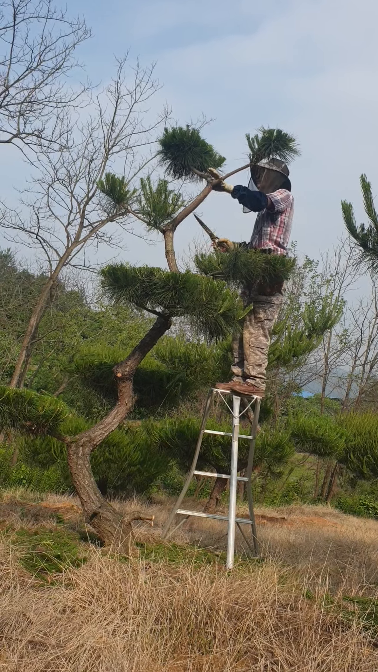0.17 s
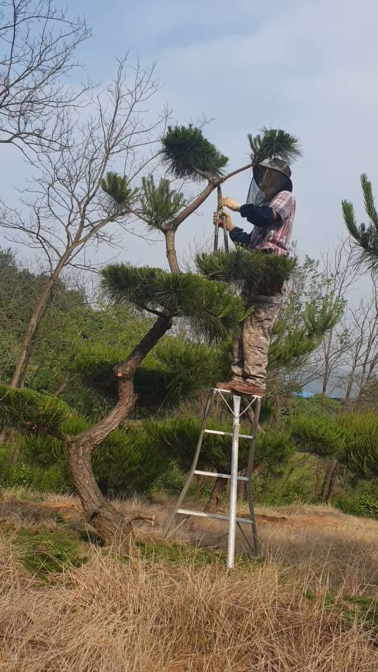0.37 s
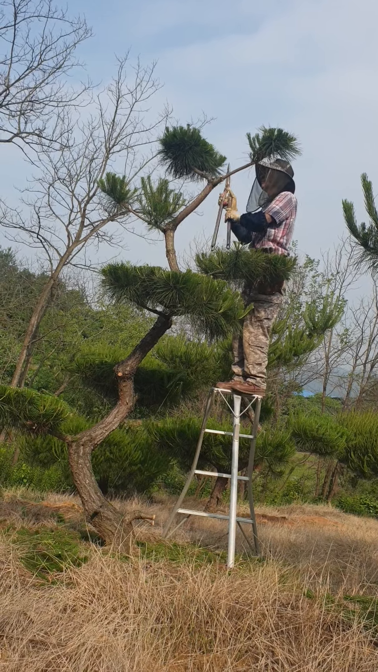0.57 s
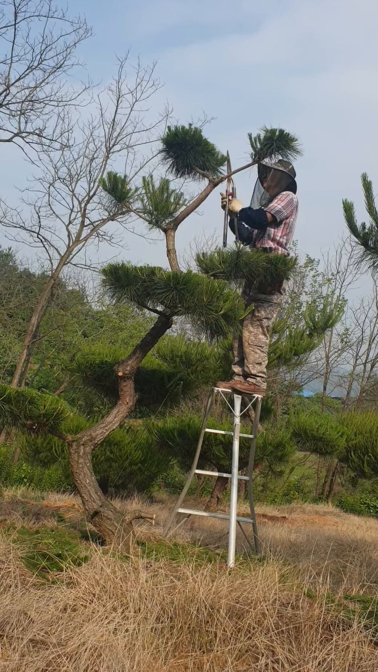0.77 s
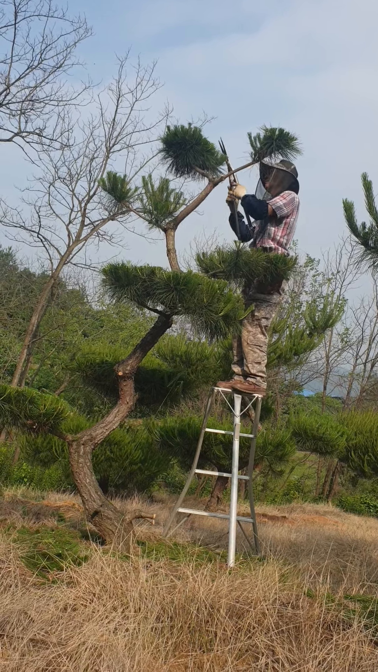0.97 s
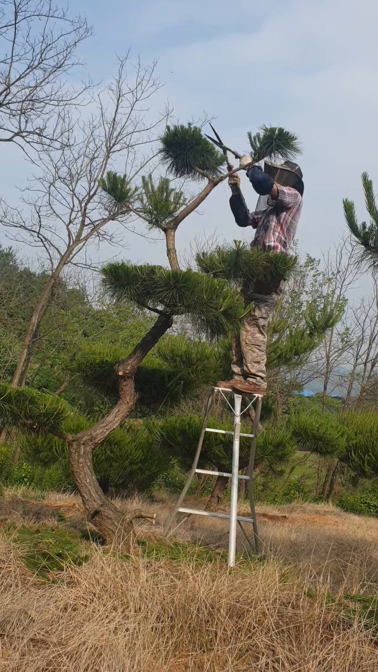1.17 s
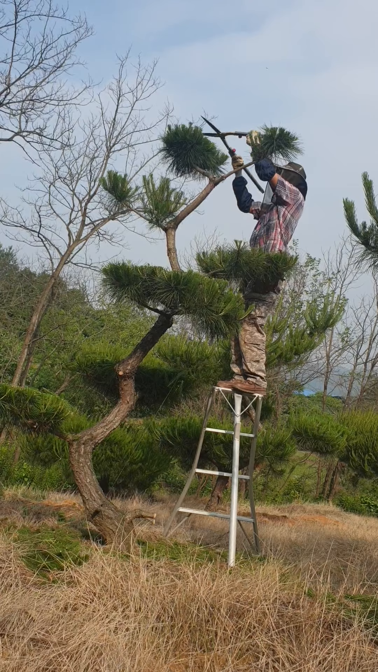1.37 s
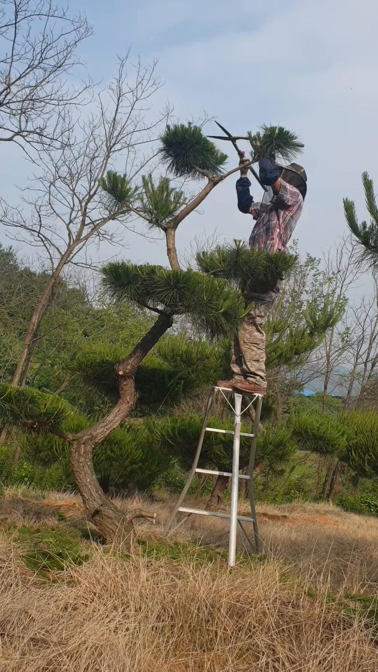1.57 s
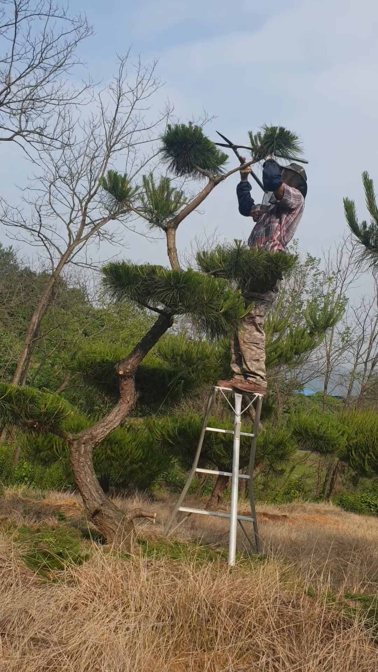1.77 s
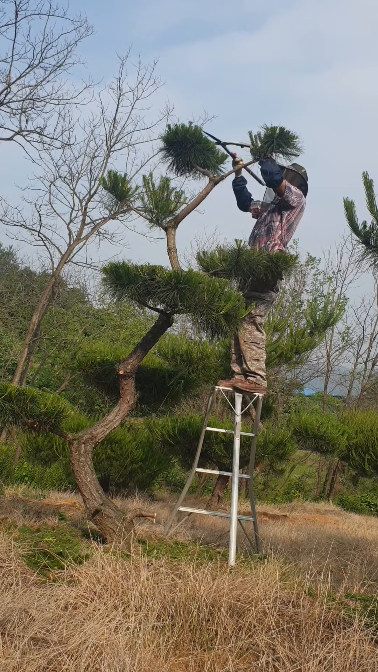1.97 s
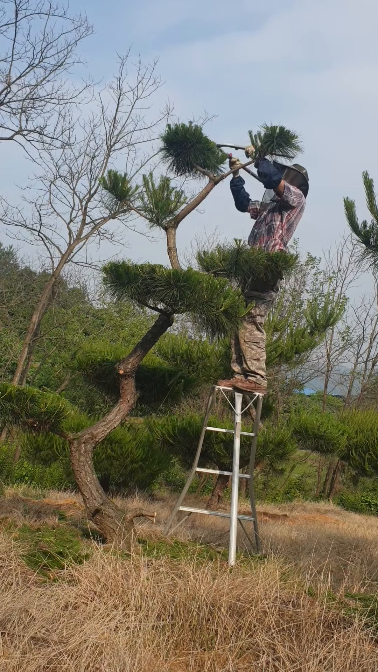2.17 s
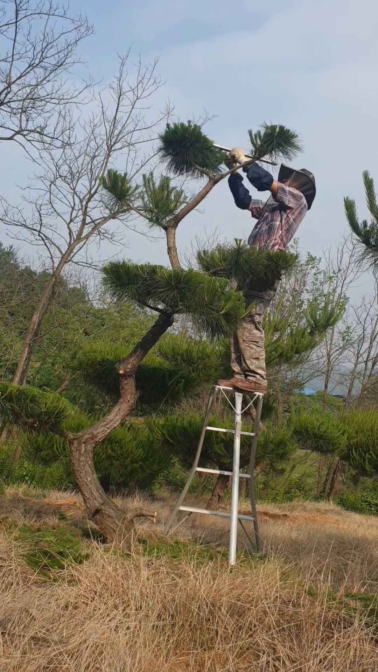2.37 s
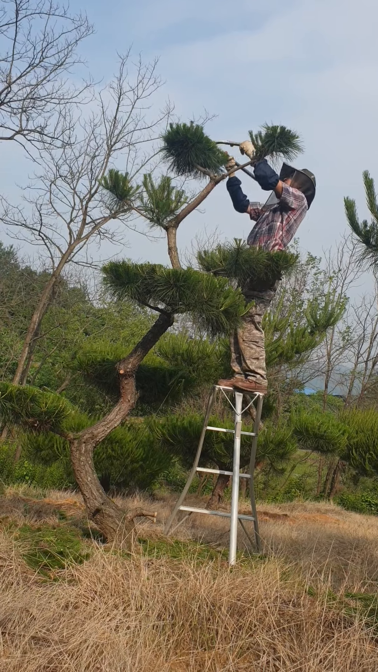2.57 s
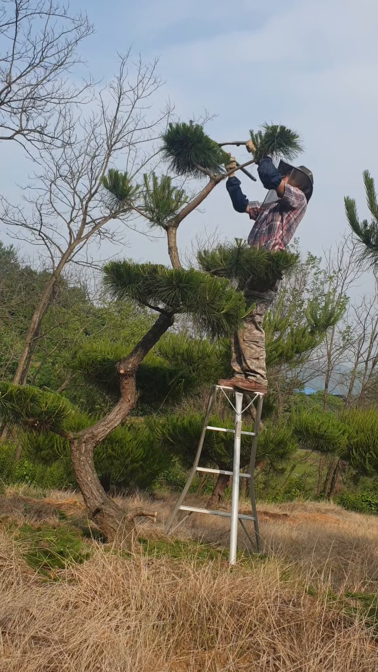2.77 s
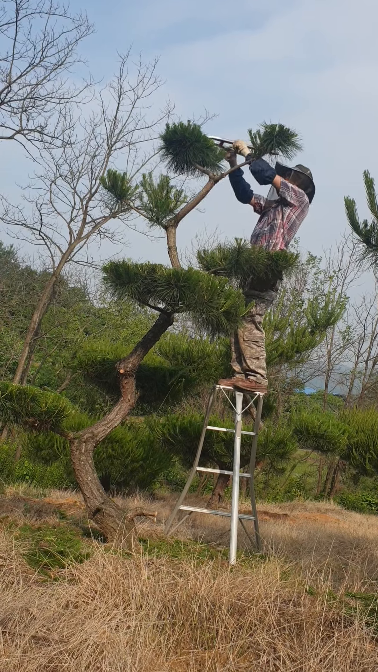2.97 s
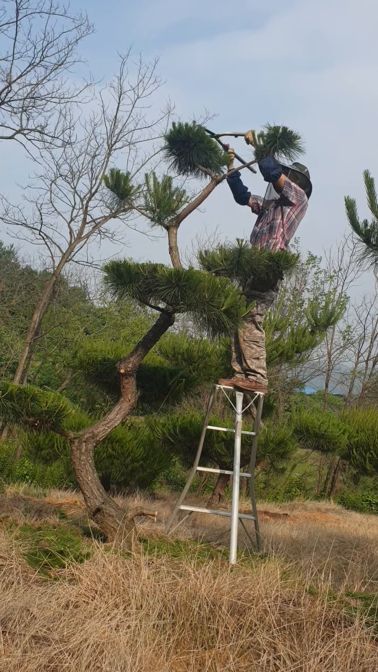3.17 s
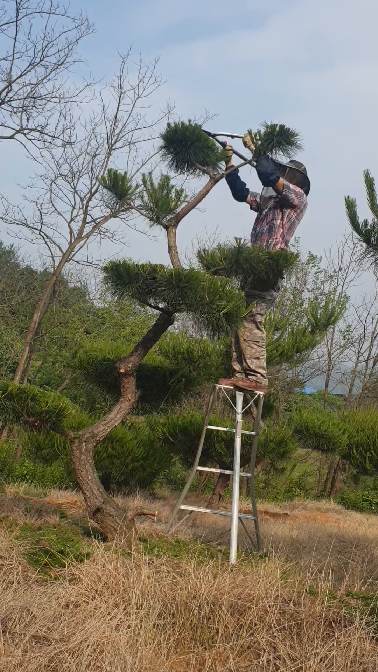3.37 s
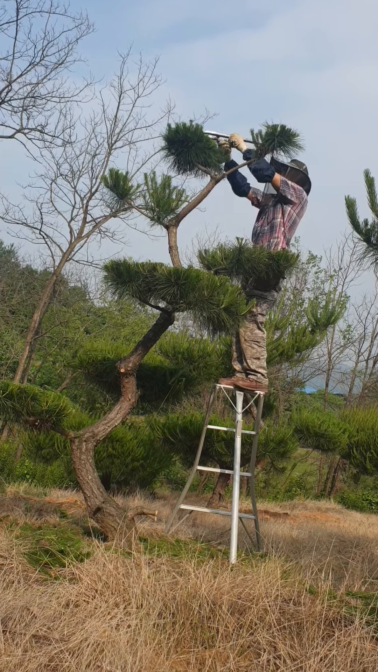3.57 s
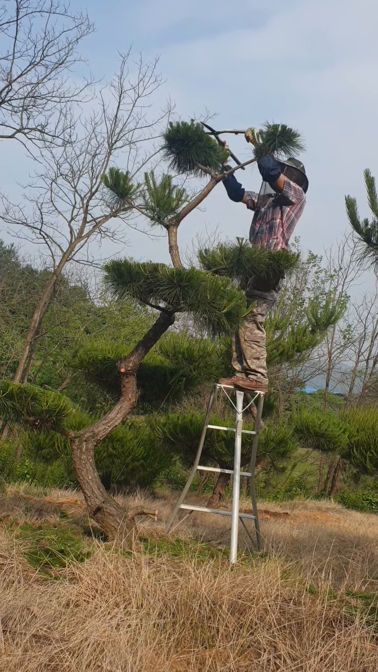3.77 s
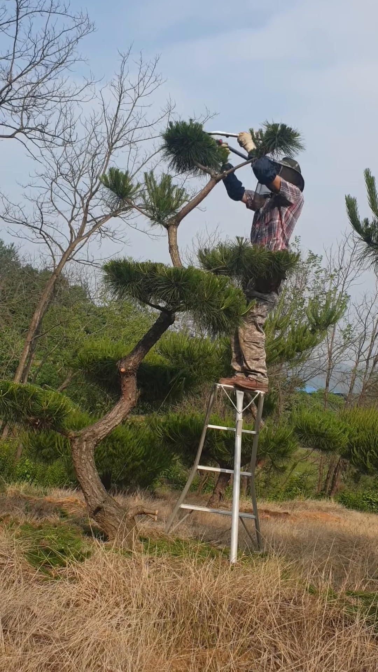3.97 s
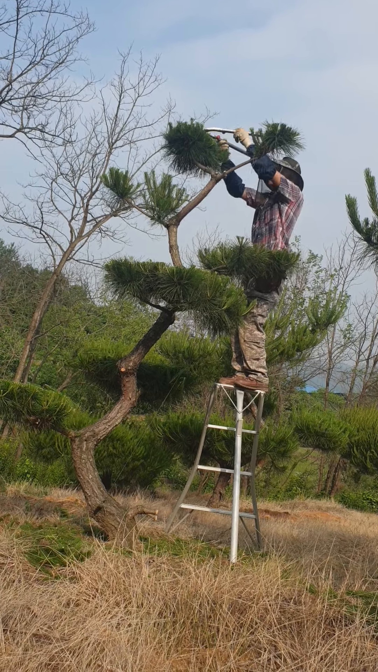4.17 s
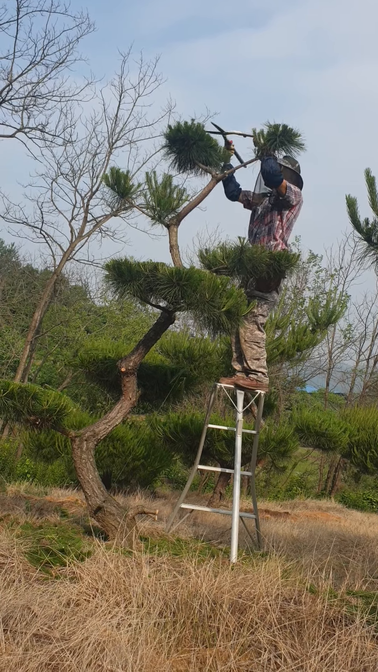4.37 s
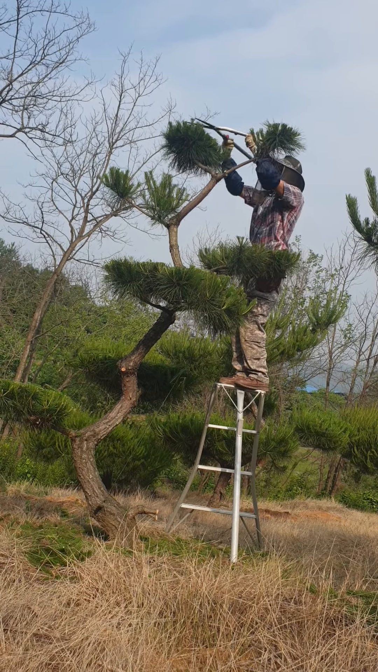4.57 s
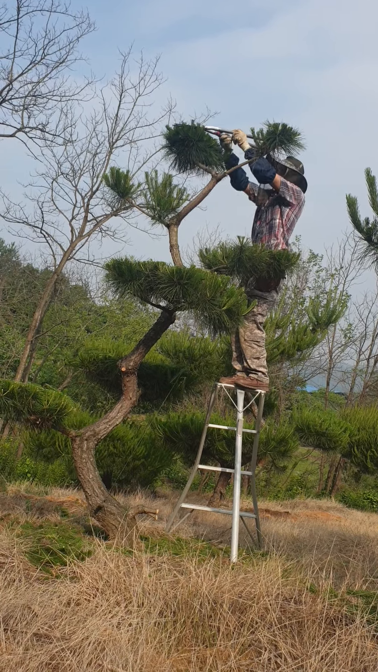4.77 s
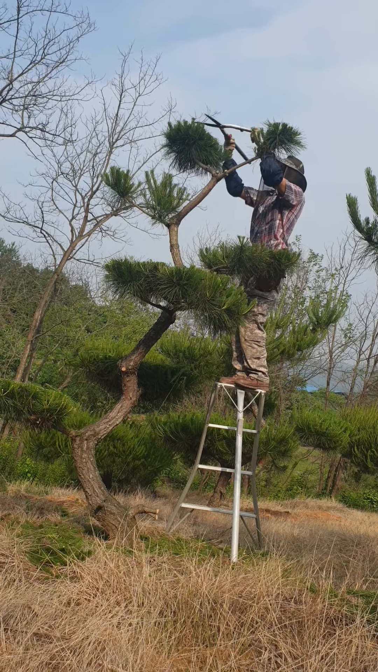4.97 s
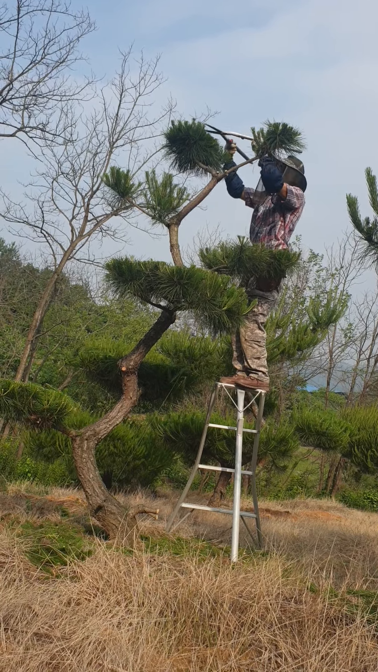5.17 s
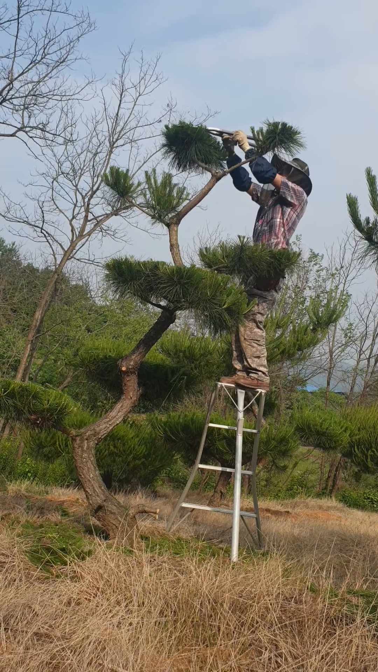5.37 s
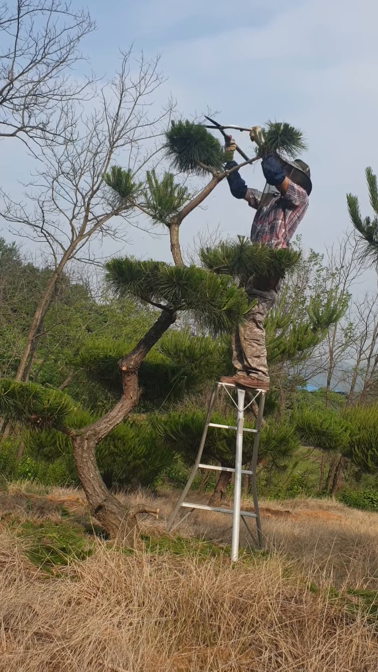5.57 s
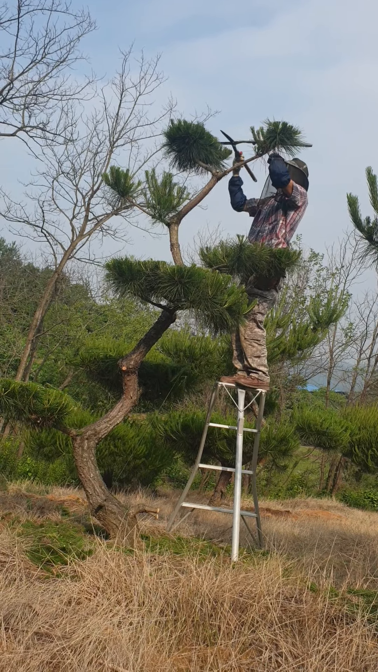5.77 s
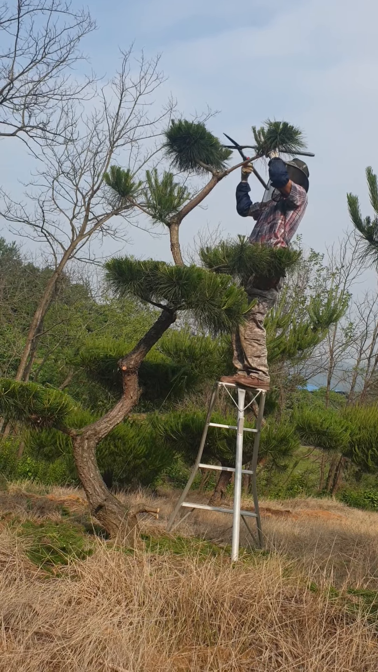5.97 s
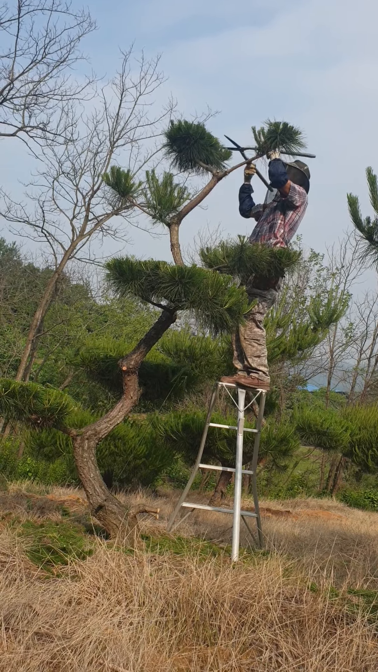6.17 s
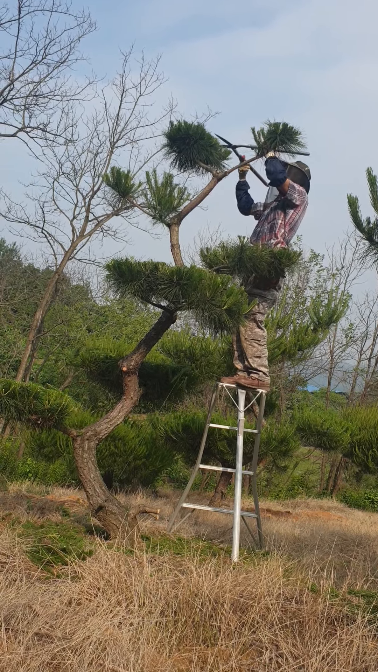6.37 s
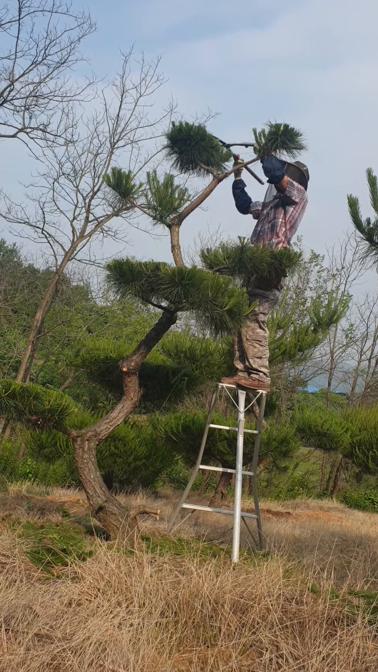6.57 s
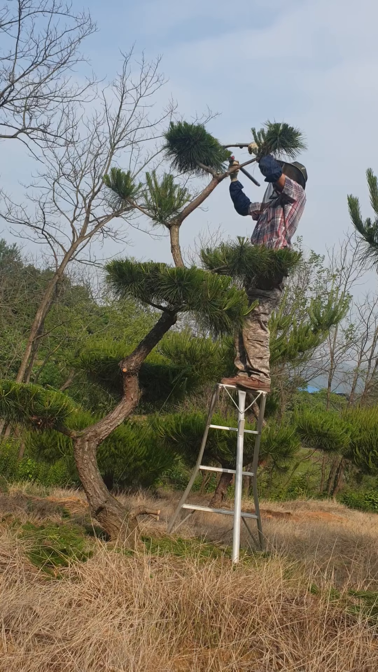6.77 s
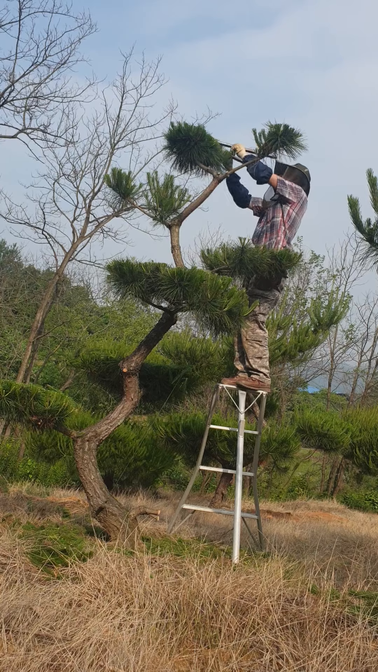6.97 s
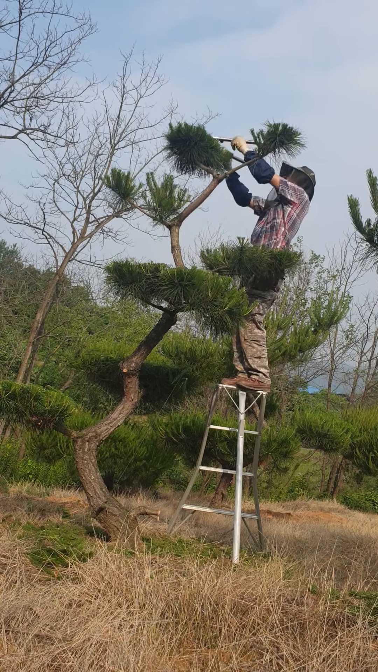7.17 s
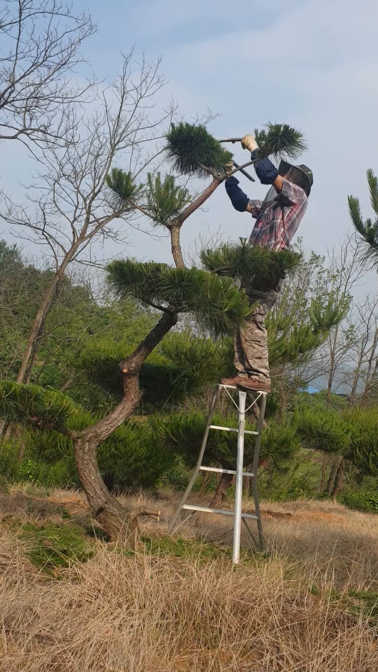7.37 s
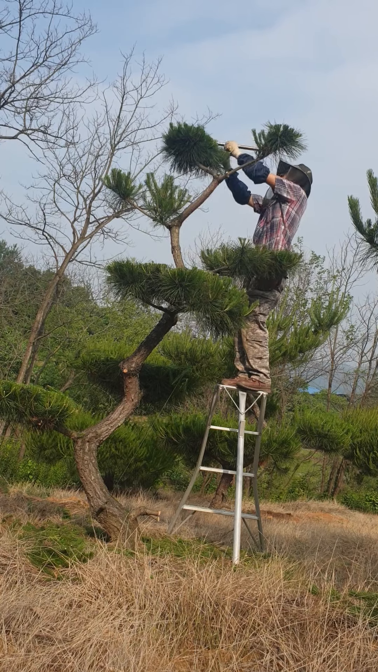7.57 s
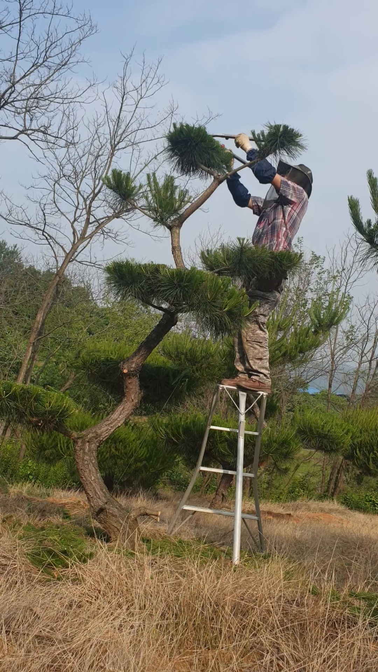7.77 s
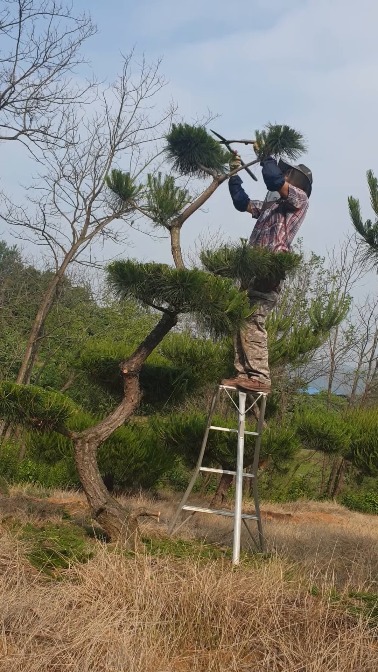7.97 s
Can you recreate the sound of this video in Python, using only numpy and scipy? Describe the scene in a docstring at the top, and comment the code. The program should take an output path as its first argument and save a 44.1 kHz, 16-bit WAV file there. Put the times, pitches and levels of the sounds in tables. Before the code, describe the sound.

Crisp garden-shear cuts through needly twigs, steel rasping between snips, over soft low rumble while distant birds chirp and a cuckoo calls.

```python
"""Hand shears trim a pine, a few metres away and to the right, over outdoor rumble and a distant engine's hum.
Far birds chirp first; needle noise brushes the blades, twigs crackle, blades scrape and a cuckoo calls.
From 3 s, five cuts: crunching noise swells, kicks snap the shoot, handles knock and blades scrape after.
A lull of rustles, twigs and a hoarse far whistle leads to two last cuts, the final one faint.
The trees scatter the work as short echoes and a fading hush of noise; the birds are blurred by echoes too."""
import sys
import numpy as np
from scipy import signal
from scipy.fft import rfft, irfft, next_fast_len
from scipy.io import wavfile
from scipy.ndimage import map_coordinates

SR = 44100
rng = np.random.default_rng(int(sys.argv[2]) if len(sys.argv) > 2 else 0)


def digitize_waveform(pressure):
    """Quantize a signal to 16-bit integers and store it at the path in sys.argv[1].

    Rows of a 2-D input are taken as channels; values are limited to [-1, 1].
    """
    field = np.atleast_2d(pressure).T
    bounded = np.clip(field, -1, 1)
    quanta = np.round(bounded * 32767).astype(np.int16)
    wavfile.write(sys.argv[1], SR, quanta)


N = 353241
TIME = np.arange(N) / SR
SIZE = 2 * next_fast_len((N + SR // 2) // 2)
HZ = np.maximum(np.arange(SIZE // 2 + 1) * SR / SIZE, 1)

# Event levels set each layer's drive, ahead of tone colour and space; colour levels are relative.

# outdoor background spectrum: pitch_hz, level_db (per Hz)
AIR_COLOUR = [(12, -24), (25, -7.5), (42, -7.5), (80, -8), (115, -11.5), (160, -13.5), (210, -23),
              (300, -23.5), (400, -31), (650, -33.5), (1800, -37), (4200, -36), (9300, -42), (15000, -39)]
# likeness of the background at the two microphones: pitch_hz, likeness (-1 to 1)
AIR_LIKENESS = [(60, .85), (130, 0.76), (290, .7), (640, .45), (1400, 0.12), (3100, -.06), (7000, 0.1),
                (15000, -0.19)]
AIR_DB = -76  # of the shared part above 400 Hz, before the left/right balance
# distant engine, gliding from point to point: time_s, firing_rate_hz, level_db
ENGINE_PATH = [(0.0, 109.2, -65.5), (0.87, 109.6, -63), (1.14, 106.2, -68), (2.56, 112.7, -64),
               (2.74, 108.9, -66), (3.03, 111.7, -67), (4.12, 115.2, -66), (4.21, 108.9, -62.5),
               (4.41, 107.6, -71), (4.81, 106.9, -67.5), (5.59, 115.2, -66), (5.81, 109.7, -69),
               (6.35, 109.7, -69.5), (7.29, 109.6, -66), (7.51, 100.1, -72.5), (7.75, 101, -63.5),
               (7.82, 99.4, -70), (8.0, 113.3, -72)]

# small birds' chirps: start_s, top_pitch_hz, length_s, level_db
CHIRPS = [(.345, 4580, 0.068, -74), (.52, 3540, .05, -74.5), (1.275, 4460, 0.083, -73),
          (1.717, 4210, 0.023, -71), (1.931, 4670, 0.054, -76), (2.094, 3820, 0.037, -65),
          (2.185, 4486, 0.043, -67), (2.218, 3390, .036, -68), (2.25, 3810, 0.033, -62),
          (5.565, 4340, 0.067, -69.5), (6.84, 3780, 0.05, -75.5), (7.32, 3850, 0.057, -74.5),
          (7.401, 4560, 0.044, -70), (7.433, 3700, 0.042, -71.5), (7.475, 3996, 0.048, -72)]
# pitch through one chirp: position (share of length), drop (share from top to low pitch)
CHIRP_SHAPE = [(0, 0.8), (.35, 0.057), (.68, 0.71), (1, 1.2)]
CHIRP_LOW_HZ = 3160  # where a drop of one lands; the shape dips past it
# far cuckoo calls: start_s, level_db
CUCKOO_CALLS = [(2.02, -76.5), (3.92, -71.5), (6.255, -71), (7.805, -71)]
# the cuckoo's high and low note: delay_s, top_pitch_hz, low_pitch_hz, length_s, level_db (against the call)
CUCKOO_NOTES = [(0, 807, 669, .077, -1.5), (.343, 660, 630, .18, -13)]
# thin hoarse far whistle: start_s, top_pitch_hz, low_pitch_hz, length_s, level_db
WHISTLE = [(6.15, 1849, 1816, .392, -79)]
# pitch through an arched note: position (share of length), drop (share from top to low pitch)
ARCH_SHAPE = [(0, 1), (0.449, 0), (.7, .25), (1, 0.95)]

# colour of the scatter from the trees: pitch_hz, level_db
TREE_COLOUR = [(200, -23), (700, -14), (1400, -15.5), (2300, -6), (3200, -5), (4800, -2.5), (7300, -9),
               (9300, -12), (11500, -8.5), (15500, -27)]
# direct sound at the left microphone against the right: pitch_hz, level_db
LEFT_COLOUR = [(200, -9.5), (600, 3), (1000, -4.5), (1400, -1.5), (2400, -3), (4400, -13.5), (5500, -13.5),
               (6600, -15.5), (8100, -10.5), (9400, -4), (11200, -5), (12500, -3), (15000, 2.5)]
LEFT_LEAD_S = .000131  # the direct sound comes this much sooner on the left

# sleeves swishing as the arms move: peak_s, level_db, swell_and_fade_s
SWISHES = [(1.12, -72, 0.058), (3.141, -68, 0.057), (5.818, -69.5, 0.11), (6.201, -66.5, 0.066),
           (7.89, -70.5, 0.087)]
SWISH_HZ = 5000  # centre of the band at the peak
# needles brushing the moving blades: peak_s, level_db, swell_s, fade_s
BRUSHES = [(0.681, -68.5, 0.12, 0.27), (1.4, -72, 0.33, 0.12), (1.66, -72.5, 0.036, 0.16),
           (2.34, -69, 0.059, .28), (6.24, -71.5, 0.057, .24)]
# colour of brushed needles: pitch_hz, level_db
BRUSH_COLOUR = [(500, -27), (2500, -5), (4200, 0), (5500, -6.5), (7100, 0), (9300, -18), (15500, -16)]
# the blades push into the tuft just before each cut; the level is against the needle crunch
ENTRY_LEAD_S, ENTRY_SWELL_S, ENTRY_FADE_S, ENTRY_DB = .028, 0.069, .02, -28

# blades opening or closing on little: peak_s, level_db, swell_and_fade_s, handle_judder_level_db
SCRAPES = [(1.02, -61, 0.056, -65), (2.373, -52.5, 0.023, -69), (2.534, -64.5, 0.026, -101),
           (3.065, -55, 0.055, -86), (3.637, -47.5, 0.026, -61), (4.166, -50.5, 0.036, -60.5),
           (4.834, -54.5, 0.046, -67), (5.497, -49.5, .032, -67), (7.189, -51, 0.033, -87),
           (7.616, -45.5, 0.023, -73), (7.657, -49.5, 0.028, -59), (7.744, -50.5, 0.025, -84)]
# colour of the sliding blades: pitch_hz, level_db
SCRAPE_COLOUR = [(150, -33), (600, -20), (1000, -21.5), (1700, -26.5), (2400, -6.5), (3200, -1), (4300, 1),
                 (5500, -4), (7100, 0), (9300, -14.5), (11000, -8.5), (15500, -28)]
# colour of the juddering handles: pitch_hz, level_db
JUDDER_COLOUR = [(150, -12.5), (750, -11), (1050, -11.5), (1400, -7), (1800, -11), (2250, 2.5),
                 (2900, -1.5), (5000, -17.5), (12000, -35)]

# cuts through a shoot: cut_s, snap_level_db, snap_hold_s, needle_crunch_level_db, bark_tear_level_db,
# blade_clank_level_db, handle_knock_level_db, last_strand_delay_s, last_strand_crack_level_db
CUTS = [(2.9561, -12, 0.00061, -36.5, -33, -33.5, -45.5, 0.018, -23.5),
        (3.502, -17.5, 0.0023, -36.5, -35.5, -36, -41.5, .0188, -25),
        (4.0926, -20, 0.0014, -32, -40, -29.5, -42.5, 0.031, -37.5),
        (4.7229, -17, 0.00082, -32, -33, -44, -42, .019, -26),
        (5.353, -21.5, .0013, -35, -36.5, -41, -38.5, 0.042, -43),
        (7.0541, -18, 0.00035, -33, -37, -59.5, -46, 0.029, -40),
        (7.606, -42, 0.00099, -51, -50.5, -82, -59.5, 0.045, -39)]
# single twigs cracking around the cuts: start_s, level_db
TWIG_CRACKS = [(.837, -56), (1.621, -60), (1.754, -59), (2.353, -47), (2.395, -45.5), (3.015, -41),
               (3.106, -46.5), (3.68, -48), (5.315, -32), (5.3497, -30.5), (6.131, -59), (6.169, -45.5),
               (6.409, -56), (7.018, -42.5), (7.591, -53), (7.676, -43), (7.741, -59)]
# colour of breaking wood and needles: pitch_hz, level_db
SNAP_COLOUR = [(150, -47.5), (500, -28), (1400, -32), (2200, -7.5), (3100, -7), (4000, -2.5), (4800, 0.5),
               (5450, -7.5), (6400, -1), (7500, 0.5), (8400, -7.5), (9400, -18), (11000, -3.5),
               (15500, -23)]
# the blades close through the needles, then the bark tears
CLOSING_S, TEAR_HOLD_S, TEAR_DECAY_S = 0.019, 0.0087, 0.0089
# fibres give way within this time either side of the snap; the level is against the needle crunch
SPLINTER_WINDOW_S, SPLINTER_DB, SPLINTER_SPREAD_DB = 0.012, -0.5, 2.0
# colour of the knock in the handles: pitch_hz, level_db
KNOCK_COLOUR = [(100, -19.5), (300, -14.5), (550, -3.5), (900, 5), (1200, -3), (1600, -3), (2200, 5.5),
                (3000, 0), (5000, -27), (12000, -42.5)]
# the handles strain before the shoot gives way, then ring down
STRAIN_S, KNOCK_DECAY_S = .0065, 0.017
# ringing of the steel blades: pitch_hz, width_hz, level_db (against the unrung sound)
BLADE_RINGS = [(2280, 220, -6), (2690, 150, -6), (2886, 60, -0.5), (3500, 250, -10), (4047, 130, -7.5),
               (4943, 160, -4), (5990, 64, -7), (6530, 260, -5), (7360, 53, -9.5)]
# the blades' lowest bending, set off as they jump through the shoot
CLANK_HZ, CLANK_WIDTH_HZ, CLANK_DECAY_S = 2230, 380, 0.0059

TOP_HZ = 15900  # where the recorder stops passing treble


def undb(db):
    """Decibels to gain."""
    return 10 ** (np.asarray(db) / 20)


def unit(x):
    """Scale to an rms of one."""
    return x / np.sqrt(np.mean(np.abs(x) ** 2))


def across(points):
    """Read a (pitch_hz, value) table along the log-frequency axis."""
    hz, value = np.transpose(points)
    return np.interp(np.log(HZ), np.log(hz), value)


def filtered(x, response):
    """Pass a sound through a frequency response."""
    return irfft(rfft(x, SIZE) * response)[..., :N]


def colour(points):
    """Causal, minimum-phase tone colour of unit power with the given outline."""
    cepstrum = irfft(np.log(undb(across(points))))
    return unit(np.exp(rfft(2 * cepstrum[:SIZE // 2], SIZE)))


def walk(rate):
    """Smooth random wandering, rate knots per second, with an rms of one."""
    knots = rng.standard_normal(4096)
    return unit(map_coordinates(knots, [TIME * rate], order=2, mode="wrap"))


def swell(at, rise, fall):
    """A bell-shaped envelope with its own rise and fall."""
    out = np.zeros(N)
    on = slice(*np.searchsorted(TIME, [at - 4 * rise, at + 4 * fall]))
    t = TIME[on] - at
    out[on] = np.exp(-(t / np.where(t < 0, rise, fall)) ** 2)
    return out


def burst(at, hold, decay):
    """An envelope that opens at once, holds and dies away."""
    out = np.zeros(N)
    on = slice(*np.searchsorted(TIME, [at, at + hold + 10 * decay]))
    out[on] = np.exp(-np.maximum(TIME[on] - at - hold, 0) / decay)
    return out


def crackle(rate, spread_db):
    """Dense tiny fractures: noise whose level wanders in uneven clumps."""
    return unit(rng.standard_normal(N) * undb(spread_db * walk(rate)))


def fibres():
    """Fibres tearing one after another: equal small kicks of either sign."""
    return np.sign(rng.standard_normal(N))


def scatter(x, t60, build):
    """A short cloud of uneven echoes, different at each microphone."""
    t = TIME[:SR]
    tail = rng.standard_normal((2, SR)) * undb(-60 * t / t60) * (1 - np.exp(-t / build))
    tail /= np.sqrt(np.sum(tail ** 2, axis=1, keepdims=True))
    return signal.oaconvolve(x[None], tail, axes=1)[:, :N]


def air():
    """Low rumble largely shared by both microphones, with a faint, more separate hiss above it."""
    likeness = np.clip(across(AIR_LIKENESS), -.98, .98)
    outline = undb(across(AIR_COLOUR))
    outline /= np.sqrt(np.mean(outline ** 2 * (HZ > 400)))
    mid = filtered(rng.standard_normal(N), outline)
    # the less alike the microphones, the stronger the difference between them
    side = filtered(rng.standard_normal(N), outline * np.sqrt((1 - likeness) / (1 + likeness)))
    level = undb(AIR_DB + .5 * walk(1.8))
    return np.array([mid + side, mid - side]) * level * undb([[-.7], [.7]])


def engine():
    """A distant engine, only its lowest note left, wavering in phase and level on the way."""
    s, hz, db = np.transpose(ENGINE_PATH)
    phase = 2 * np.pi * np.cumsum(np.interp(TIME, s, hz)) / SR + 0.28 * walk(18)
    level = undb(np.interp(TIME, s, db) + 1.4 * walk(8.4))
    return np.sqrt(2) * np.sin(phase) * level * undb([[-1.2], [.3]])


def calls(notes, shape, waver, rate):
    """Near-pure bird notes: a sine follows one pitch shape, swelling and fading over its length."""
    out, unsteady = np.zeros(N), 1 + waver * walk(rate)
    for at, top_hz, low_hz, length, db in notes:
        on = (TIME >= at) & (TIME < at + length)
        share = (TIME[on] - at) / length
        drop = np.interp(share, *np.transpose(shape))
        hz = (top_hz + (low_hz - top_hz) * drop) * unsteady[on]
        tone = np.sqrt(2) * np.sin(2 * np.pi * np.cumsum(hz) / SR)
        out[on] += undb(db) * np.sin(np.pi * share) * tone
    return out


def birds():
    """Chirps, a cuckoo and a whistle from far off, blurred by the wood's echoes."""
    chirps = [(at, top_hz, CHIRP_LOW_HZ, length, db) for at, top_hz, length, db in CHIRPS]
    cuckoo = [(at + delay, top_hz, low_hz, length, db + note_db)
              for at, db in CUCKOO_CALLS for delay, top_hz, low_hz, length, note_db in CUCKOO_NOTES]
    song = calls(chirps, CHIRP_SHAPE, waver=.024, rate=470)
    song = song + calls(cuckoo, ARCH_SHAPE, waver=.006, rate=200)
    song = song + calls(WHISTLE, ARCH_SHAPE, waver=0.039, rate=760)
    direct = song * undb([[-5], [-4]])
    early = scatter(song, t60=0.086, build=0.0025)
    late = undb(-7) * scatter(song, t60=.5, build=0.014)
    return direct + early + late


def foliage(x, t60, treble_t60):
    """Many needles hand the energy back as a fading hush of noise whose treble dies first."""
    out = 0
    treble = across([(5000, 0), (10000, 1)])
    tree_colour = unit(undb(across(TREE_COLOUR)))
    for seconds, share in ((t60, 1 - treble), (treble_t60, treble)):
        keep = np.exp(-2 * np.log(1000) / (seconds * SR))
        level = np.sqrt(signal.lfilter([1 - keep], [1, -keep], x ** 2))
        hush = np.array([unit(rng.standard_normal(N)) for _ in range(2)])
        out = out + filtered(level * hush, np.sqrt(share) * tree_colour)
    return out


def sleeves(knots_per_s, glide_hz_per_s):
    """Cloth sliding on cloth: a band of hiss that climbs through each arm movement."""
    weave = walk(knots_per_s) + 1j * walk(knots_per_s)
    out = np.zeros(N)
    for at, db, length in SWISHES:
        speed = swell(at, length, length)
        on = speed > 0
        t = TIME[on] - at
        carrier = np.exp(2j * np.pi * (SWISH_HZ + glide_hz_per_s * t / 2) * t)
        out[on] += undb(db) * speed[on] * np.real(weave[on] * carrier)
    return out


def rubbing(strokes, outline, rate, spread_db):
    """Sticking and slipping: coloured crackle that swells and fades with each stroke."""
    speed = sum(undb(db) * swell(at, rise, fall) for at, db, rise, fall in strokes)
    return filtered(speed * crackle(rate, spread_db), colour(outline))


def brushing():
    """Needles sweep along the blades on the way into each cut and whenever the shears are moved."""
    entries = [(at - ENTRY_LEAD_S, crunch_db + ENTRY_DB, ENTRY_SWELL_S, ENTRY_FADE_S)
               for at, _, _, crunch_db, *_ in CUTS]
    return rubbing([*entries, *BRUSHES], BRUSH_COLOUR, rate=110, spread_db=3.0)


def scraping():
    """Steel rasps on steel, and the friction shakes the handles."""
    slides = [(at, db, length, length) for at, db, length, _ in SCRAPES]
    judders = [(at, db, length, length) for at, _, length, db in SCRAPES]
    rasp = rubbing(slides, SCRAPE_COLOUR, rate=560, spread_db=3.0)
    rasp = rasp + rubbing(judders, JUDDER_COLOUR, rate=290, spread_db=4)
    # the blade-tip echo comes sooner or later as the contact slides, so the colour keeps shifting
    echo_s = .0007 + .00015 * walk(25)
    echo = map_coordinates(rasp, [(TIME - echo_s) * SR], order=3)
    return 0.94 * rasp + 0.92 * echo


def knocking():
    """The sudden release jolts the handles, which sound lower and longer than the snap."""
    jolts = 0
    for at, *_, db, _, _ in CUTS:
        jolt = swell(at, STRAIN_S, fall=0.00067) + burst(at, hold=.002, decay=KNOCK_DECAY_S)
        jolts = jolts + undb(db) * jolt
    return filtered(jolts * fibres(), colour(KNOCK_COLOUR))


def clanking():
    """The blades jump through the shoot and flex with a brief steely note."""
    flex = sum(undb(db) * burst(at, hold=0.00079, decay=CLANK_DECAY_S)
               for at, _, _, _, _, db, *_ in CUTS)
    bending = unit((1 + 2j * (HZ - CLANK_HZ) / CLANK_WIDTH_HZ) ** -2)
    return filtered(flex * fibres(), bending)


def splinters(count):
    """Envelope of a few fibres breaking at random moments around every snap."""
    out = 0
    for at, _, _, crunch_db, *_ in CUTS:
        for offset, size in zip(rng.uniform(-1, 1, count), rng.standard_normal(count)):
            gain = undb(crunch_db + SPLINTER_DB + SPLINTER_SPREAD_DB * size)
            out = out + gain * burst(at + SPLINTER_WINDOW_S * offset, hold=0.00052, decay=.0011)
    return out


def cutting():
    """Needles crunch ever harder until the shoot snaps and tears to its last strand; stray twigs crack."""
    snaps = sum(undb(db) * (swell(at, rise=.0007, fall=.0001) + burst(at, hold, decay=.0008))
                for at, db, hold, *_ in CUTS)
    strands = [(at + delay, db) for at, *_, delay, db in CUTS]
    cracks = sum(undb(db) * burst(at, hold=.0007, decay=0.0013) for at, db in [*TWIG_CRACKS, *strands])
    breaks = (snaps + cracks + splinters(count=3)) * fibres()
    tearing = sum(undb(db) * burst(at, TEAR_HOLD_S, TEAR_DECAY_S) for at, _, _, _, db, *_ in CUTS)
    bark = tearing * crackle(rate=600, spread_db=4)
    closing = sum(undb(db) * swell(at, CLOSING_S, fall=.005) for at, _, _, db, *_ in CUTS)
    # thin needles lean towards the treble
    needle_tilt = undb(across([(2000, -3), (3800, 4), (8000, 1.5), (12000, -2)]))
    needles = filtered(closing * crackle(rate=880, spread_db=4), needle_tilt)
    return filtered(breaks + bark + needles, colour(SNAP_COLOUR))


def shears():
    """The work rings the steel and arrives directly, off the nearest branches and by way of the trees."""
    modes = sum(undb(db) / (1 + 2j * (HZ - hz) / width) for hz, width, db in BLADE_RINGS)
    near = filtered(cutting() + clanking() + knocking() + scraping(), unit(1 + modes))
    near = near + brushing() + sleeves(knots_per_s=2000, glide_hz_per_s=4600)
    lead = np.exp(2j * np.pi * HZ * LEFT_LEAD_S)
    left = filtered(near, undb(across(LEFT_COLOUR)) * lead)
    branches = scatter(near, t60=0.034, build=.0005) * undb([[-15], [-14]])
    trees = foliage(near, t60=.43, treble_t60=.3) * undb([[-25], [-21]])
    return np.array([left, near]) + branches + trees


def scene():
    """The shears in front of the garden's background."""
    return air() + engine() + birds() + shears()


def record(dry):
    """The recorder cuts the top with a steep low-pass."""
    return signal.sosfilt(signal.ellip(10, .2, 70, TOP_HZ, fs=SR, output="sos"), dry)


dry = scene()
out = record(dry)
digitize_waveform(out)
```